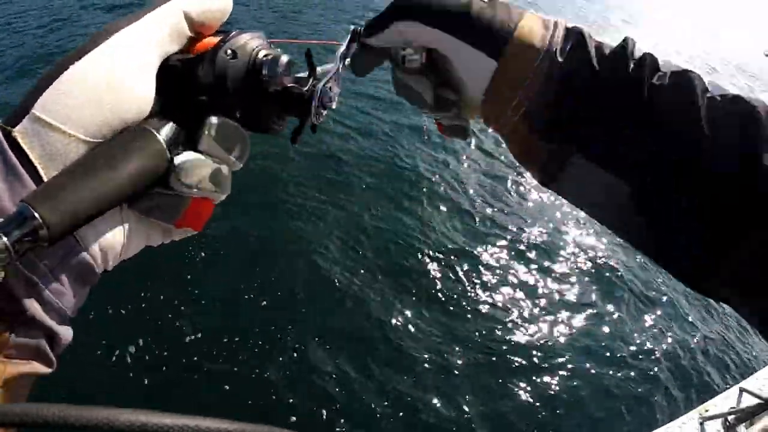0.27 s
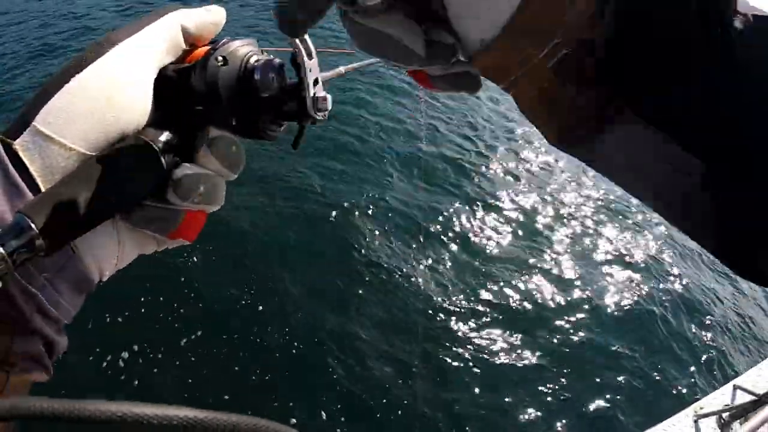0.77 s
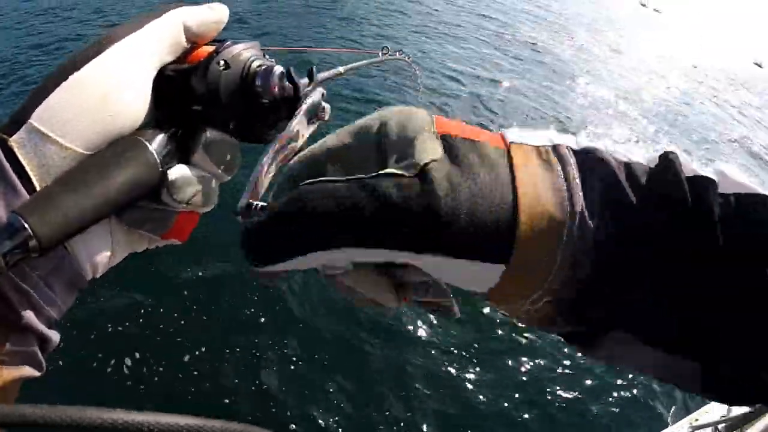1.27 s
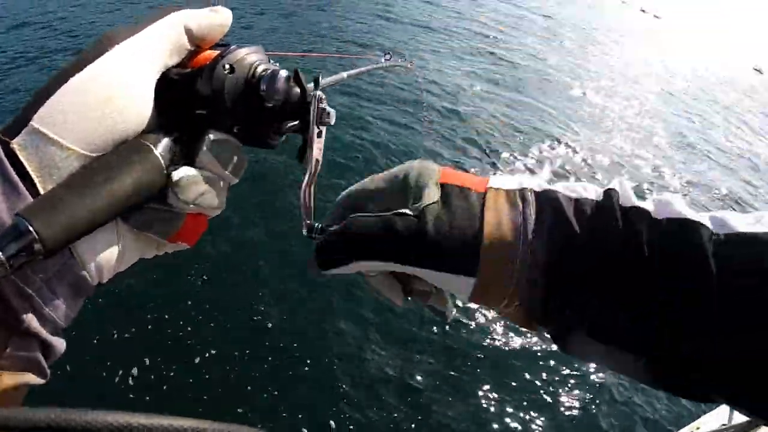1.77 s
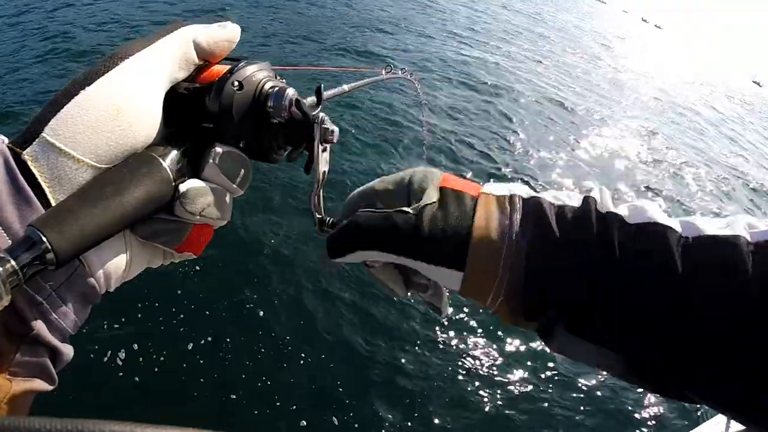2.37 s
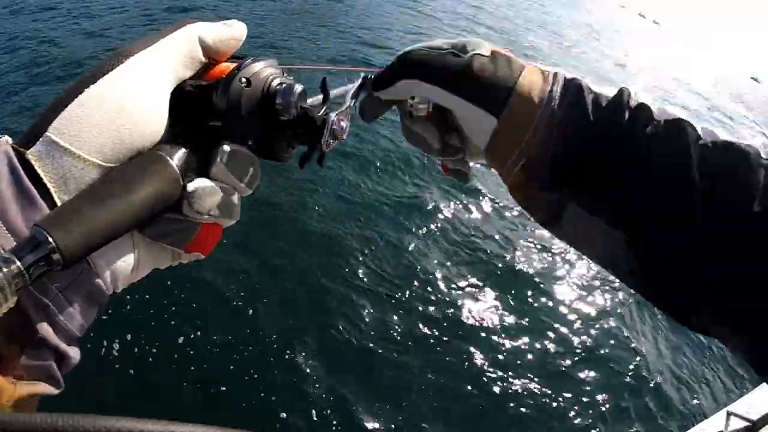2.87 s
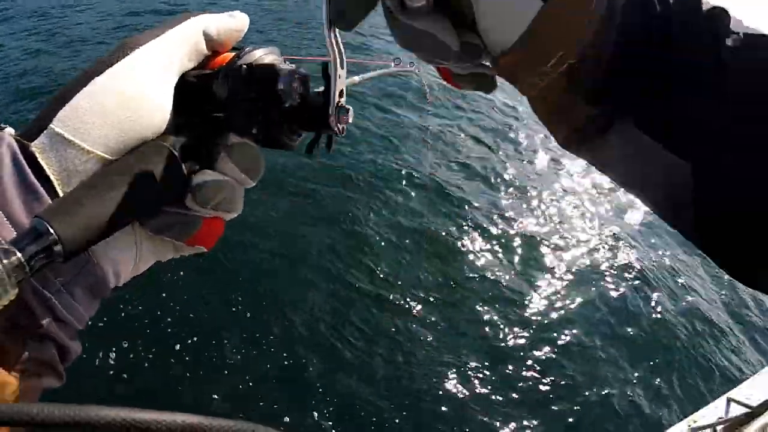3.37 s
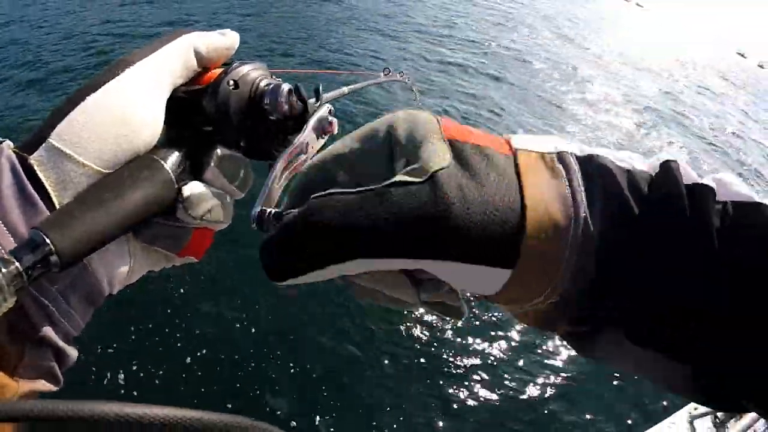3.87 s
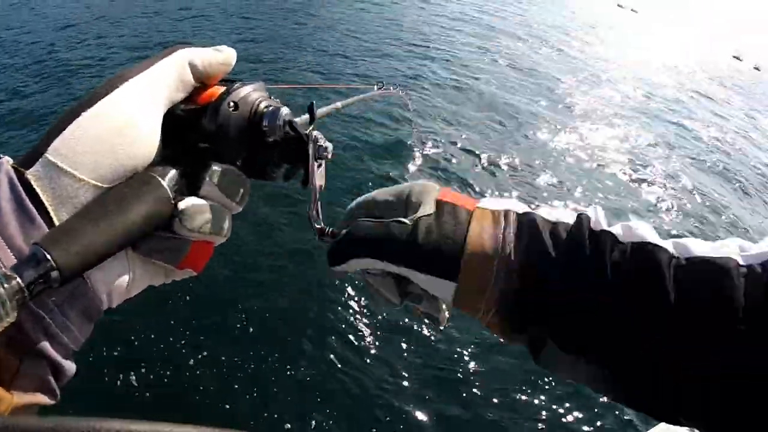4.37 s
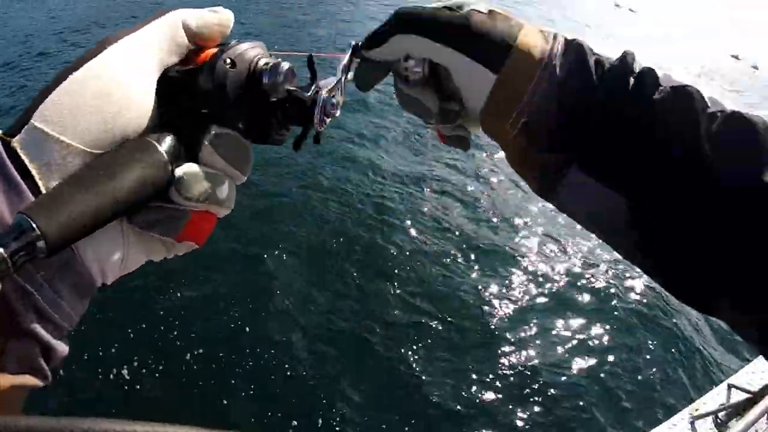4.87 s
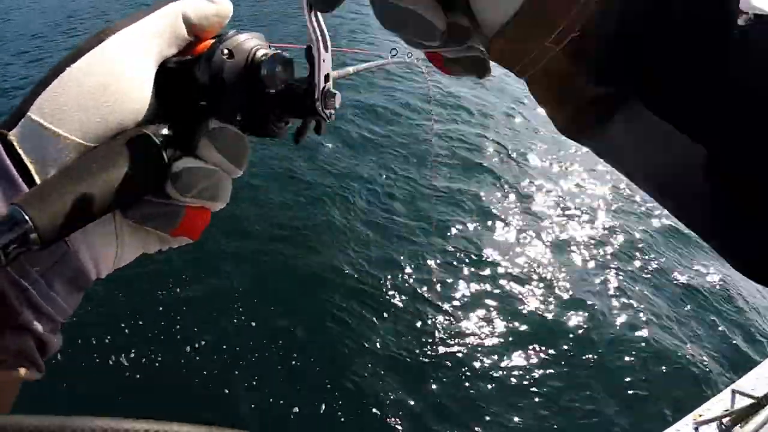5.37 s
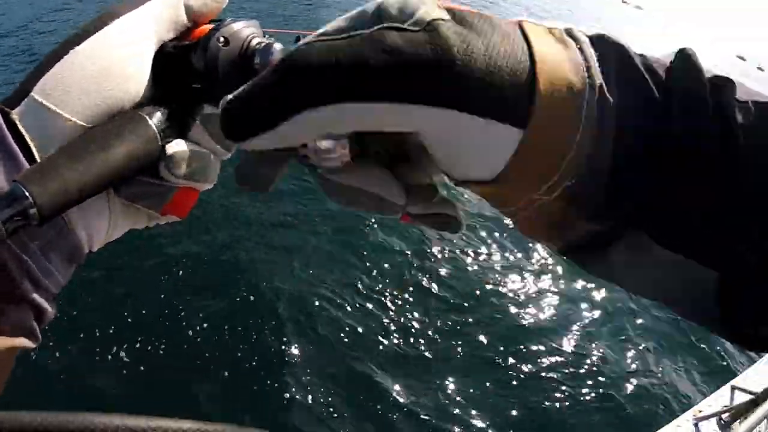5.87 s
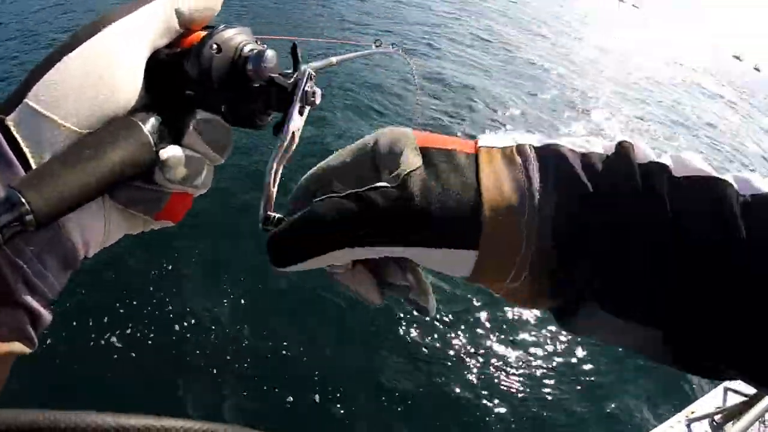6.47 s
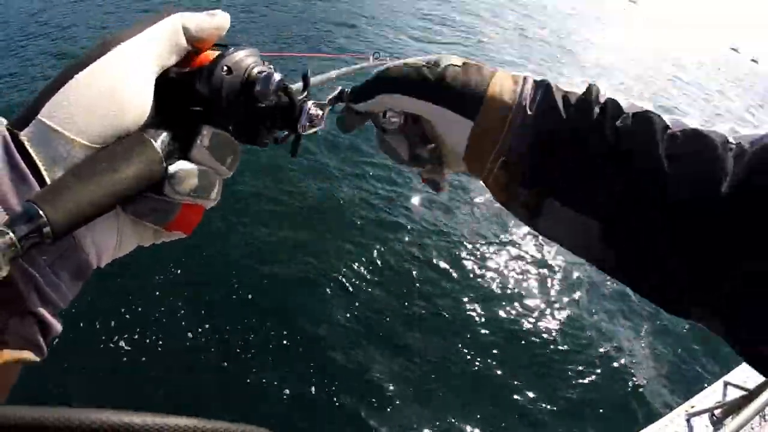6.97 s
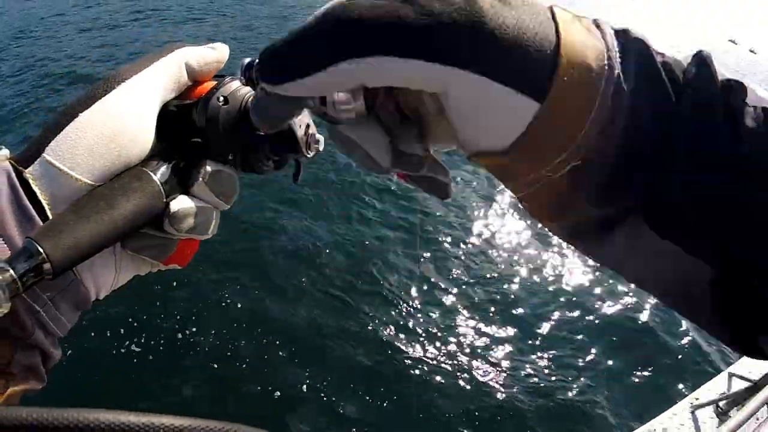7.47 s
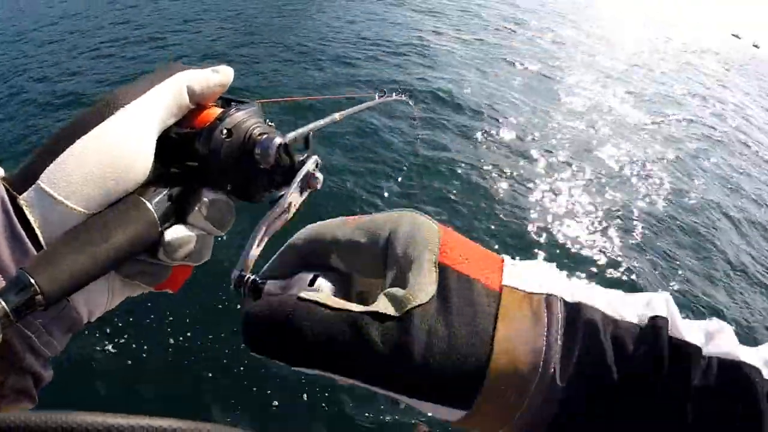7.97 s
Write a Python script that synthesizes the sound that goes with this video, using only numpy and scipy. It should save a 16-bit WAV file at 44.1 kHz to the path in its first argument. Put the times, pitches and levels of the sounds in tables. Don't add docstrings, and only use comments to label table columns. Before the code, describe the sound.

Wind thumps and buffets a housed microphone over low idling engines, while a fishing reel whirrs and ticks and water washes the hull.

```python
import sys
import numpy as np
from scipy import signal
from scipy.fft import rfft, irfft, next_fast_len
from scipy.io import wavfile
from scipy.ndimage import uniform_filter1d, minimum_filter1d

SR = 44100
rng = np.random.default_rng(int(sys.argv[2]) if len(sys.argv) > 2 else 0)


def attenuation_scalar(level_db):
    decades = np.asarray(level_db, float) / 20
    return 10 ** decades


def bounce(signal):
    frames = np.transpose(np.atleast_2d(signal))
    limited = np.clip(frames, -1, 1)
    pcm = np.round(limited * 32767).astype(np.int16)
    wavfile.write(sys.argv[1], SR, pcm)


N = 361971
T = np.arange(N) / SR


def rms_one(x):
    return x / np.sqrt(np.mean(x ** 2) + 1e-20)


def in_time(rows):
    s, level_db = np.transpose(rows)
    return np.interp(T, s, level_db)


def drift(rate):
    r = np.exp(-80 * np.pi * rate / SR)
    slow = signal.lfilter([1], [1, -2 * r, r * r], rng.standard_normal(N // 40 + 2002))[2000:]
    return np.interp(np.arange(N) / 40, np.arange(len(slow)), rms_one(slow))


def swells(times, peaks_db, half_s):
    coarse = T[::40, None]
    bells = attenuation_scalar(np.array(peaks_db)) * np.exp(-((coarse - np.array(times)) / half_s) ** 2)
    return np.interp(T, coarse[:, 0], bells.sum(axis=1))


def noise_bands(spectrum, edges_hz):
    size = next_fast_len(N)
    log_hz = np.log(np.maximum(np.arange(size // 2 + 1) * SR / size, 1))
    hz, db = np.transpose(spectrum)
    colour = attenuation_scalar(np.interp(log_hz, np.log(hz), db, -140, -140))
    whole = rfft(rng.standard_normal(size)) * colour
    bands = []
    for own in np.eye(len(edges_hz)):
        share = np.interp(log_hz, np.log(edges_hz), own)
        bands.append(irfft(whole * share, size)[:N])
    return np.array(bands) / np.std(sum(bands))


def resonance(x, hz, width_hz):
    r = np.exp(-np.pi * width_hz / SR)
    zeros = np.array([1, 0, -1]) * (1 - r * r) / 2
    return signal.lfilter(zeros, [1, -2 * r * np.cos(2 * np.pi * hz / SR), r * r], x + 1e-18)


def narrow_noise(hz, width_hz, steadiness):
    r = np.exp(-np.pi * width_hz / SR)
    slow = signal.lfilter([1], [1, -2 * r, r * r], rng.standard_normal((2, N)))
    wander = slow[0] + 1j * slow[1]
    wander = wander / (np.abs(wander) + 0.14 * np.std(wander)) ** np.clip(steadiness, 0, 1)
    band = np.real(wander * np.exp(2j * np.pi * np.cumsum(hz + 0 * T) / SR))
    return rms_one(resonance(band, np.mean(hz), 4 * width_hz))


def blows(events, length_s, width_hz, top_hz, order=4):
    size = 3000
    out, t = np.zeros(N + size), np.arange(size) / SR
    shut = signal.butter(order, top_hz, fs=SR, output="sos")
    fade = np.cos(np.pi / 2 * t / t[-1]) ** 2
    for (s, db, hz), rattle in zip(events, rng.standard_normal((len(events), size))):
        crack = (t == 0) + rattle * np.exp(-t / length_s) * .5 / np.sqrt(length_s * SR)
        burst = signal.sosfilt(shut, resonance(crack, hz, width_hz)) * fade
        start = int(s * SR)
        out[start:start + size] += attenuation_scalar(db + 3.0) * burst / np.abs(burst).max()
    return out[:N]


# (f/Hz, level/dB per Hz)
SELF_NOISE = [(3000, -6), (5900, -5.5), (6350, 0), (8000, -2), (10000, -6), (11400, -10), (12200, -8.5),
              (14000, -10.5), (14900, -13), (15500, -32)]


def preamp_hiss():
    return attenuation_scalar(-65) * noise_bands(SELF_NOISE, [1000])[0]


def hum(cycle_hz, orders, wobble):
    turn = 2 * np.pi * cycle_hz * T + wobble * drift(0.53)
    start = rng.random((len(orders), 1)) * 2 * np.pi
    return sum(np.sqrt(2) * attenuation_scalar(db) * np.sin(k * turn + p) for (k, db), p in zip(orders, start))


MAIN_CYCLE_HZ, AUX_CYCLE_HZ, GENERATOR_TURN_HZ = 6.019, 7.906, 12.13
# (multiple of its cycle, level/dB rms)
MAIN = [(5, -24.5), (6, -31), (13, -33.5), (14, -27.5), (24, -43.5), (27, -41), (42, -42), (56, -45.5),
        (58, -49.5), (71, -64), (75, -63)]
# (multiple of its cycle, level/dB rms)
AUX = [(6, -25), (14, -26.5), (18, -37.5), (26, -55), (28, -40.5), (32, -50.5), (34, -42), (46, -47),
       (56, -52.5)]
# (multiple of its turn, level/dB rms)
GENERATOR = [(5, -24.5), (10, -36), (17, -46.5), (25, -44.5), (30, -47.5), (34, -45.5)]


def engines():
    main = hum(MAIN_CYCLE_HZ, MAIN, 0.019)
    aux = hum(AUX_CYCLE_HZ, AUX, 0.021)
    return main + aux + hum(GENERATOR_TURN_HZ, GENERATOR, 0.015)


# (place in the cycle 0-1, level/dB)
KNOCKS = [
    (.02, -10.5),
    (0.199, -11),
    (0.359, 6),
    (0.488, 3.5),
    (.66, 1.5),
    (0.759, -0.5),
]


def block_knock(level_db, hz, width_hz):
    clicks = np.zeros(N)
    cycles = np.arange(int(N / SR * MAIN_CYCLE_HZ))
    for place, db in KNOCKS:
        at = ((cycles + place) / MAIN_CYCLE_HZ * SR).astype(int)
        clicks[at] = attenuation_scalar(db + 0.73 * rng.standard_normal(len(at)))
    ring = resonance(resonance(clicks, hz, width_hz), hz, 3 * width_hz)
    return attenuation_scalar(level_db) * rms_one(ring)


# (f/Hz, width/Hz, level/dB)
COVER = [(1432, 67, -0.5), (1599, 180, 4.5), (1760, 190, 0), (2923, 53, -6.5), (3390, 270, 1)]
# (t/s, level/dB)
CLATTER = [(0, -61), (.9, -55.5), (1.1, -53.5), (1.85, -56.5), (2.4, -56), (3.5, -54), (3.95, -53),
           (4.94, -55), (5.4, -57), (6.4, -53), (7.0, -56.5), (7.5, -66.5), (8.21, -52)]


def valve_clatter(sharpness, place, uneven_db):
    firing = 6 * AUX_CYCLE_HZ * T - place
    strengths = attenuation_scalar(uneven_db * rng.standard_normal(int(firing[-1]) + 3))
    strength = strengths[np.round(firing).astype(int)]
    pulse = np.exp(sharpness * (np.cos(2 * np.pi * firing) - 1))
    puffs = pulse * strength * rng.standard_normal(N)
    rings = sum(attenuation_scalar(db) * rms_one(resonance(resonance(puffs, hz, w), hz, 2 * w)) for hz, w, db in COVER)
    return attenuation_scalar(in_time(CLATTER) - 4.5) * rings


# (t/s, peak level/dB, f/Hz)
TAPS = [(0.643, -41.5, 3290), (0.6844, -46, 3310), (0.7483, -43, 3590), (0.772, -43.5, 3450),
        (0.7898, -45, 3510), (1.1256, -41, 3290), (1.4626, -42.5, 3170), (1.5485, -43.5, 3310),
        (1.5852, -41.5, 3390), (1.8025, -43.5, 3460), (2.0978, -39, 3370), (2.1818, -43, 3390),
        (2.4137, -40.5, 3520), (2.4545, -45, 3600), (2.9182, -38.5, 3390), (3.4253, -44, 3390),
        (3.4887, -40.5, 3410), (3.554, -35, 3210), (3.8064, -38, 3370), (3.846, -38, 3360),
        (3.8886, -41.5, 3350), (3.9518, -37.5, 3390), (4.0793, -42, 3150), (4.203, -40.5, 3250),
        (4.287, -43.5, 3440), (4.3113, -39, 3210), (4.3557, -39, 3200), (4.3731, -39, 3200),
        (4.4805, -41.5, 3440), (4.4983, -42, 3340), (4.634, -38, 3270), (4.7339, -41, 3230),
        (4.7546, -39, 3120), (4.8378, -37, 3350), (4.8569, -39.5, 3400), (4.9428, -41, 3390),
        (4.9645, -37, 3360), (5.0055, -41.5, 3600), (5.1106, -41.5, 3480), (5.8302, -44, 3240),
        (5.8488, -38.5, 3340), (5.8692, -40.5, 3450), (5.9354, -41, 3160), (5.954, -40, 3470),
        (6.207, -47.5, 3340), (6.2698, -46, 3190), (6.3965, -44.5, 3340), (6.437, -41.5, 3610),
        (6.4598, -39.5, 3410), (6.5033, -39.5, 3470), (6.7547, -42.5, 3360), (6.7767, -46, 3540),
        (7.0301, -37, 3210), (7.5773, -41.5, 3250), (8.041, -38, 3320), (8.0864, -41.5, 3280)]


def valve_taps():
    return attenuation_scalar(-0.5) * resonance(blows(TAPS, .004, 260, 5000), 3380, 600)


# (start t/s, length/s, first f/Hz, last f/Hz, level/dB)
MOANS = [
    (0.322, 0.12, 508, 423, -36),
    (1.067, 0.074, 515, 498, -33),
    (1.204, .07, 900, 910, -46),
    (3.647, 0.31, 494, 438.6, -34.5),
]


def moans():
    out = np.zeros(N)
    for s, length, first_hz, last_hz, db in MOANS:
        part = np.clip((T - s) / length, 0, 1)
        flutter = 3 * drift(24)
        shape = np.minimum(part * 12, 1) * (1 - part) ** 0.41 * attenuation_scalar(db - 1.5 + flutter)
        pitch_hz = first_hz + (last_hz - first_hz) * part + 12 * drift(30)
        out += np.sqrt(2) * shape * np.sin(2 * np.pi * np.cumsum(pitch_hz) / SR)
    return out


# (t/s, level/dB)
WASH = [(0, -61), (.03, -55), (.3, -51), (.71, -47.5), (1.03, -47), (1.23, -48.5), (1.45, -47.5),
        (2.4, -47.5), (2.95, -47.5), (4.46, -47.5), (5.1, -46), (5.25, -48), (6.44, -48.5), (6.95, -49.5),
        (7.2, -46), (7.6, -48.5), (7.8, -47), (8.05, -47.5)]
# (f/Hz, level/dB per Hz)
WASH_COLOUR = [(350, -36.5), (600, -2), (853, -20.5), (892, -6.5), (959, -16), (1070, -13.5), (1260, -12),
               (1430, -8.5), (1990, -8.5), (2160, -3.5), (2610, -10), (3040, -14), (3420, -11.5),
               (3770, -16.5), (5250, -19.5), (6500, -62), (11400, -120)]
# (t/s, peak level/dB)
SPLASHES = [
    (2.451, -58.5),
    (5.099, -67.5),
    (7.25, -62),
    (7.5, -45.5),
    (7.679, -55.5),
    (7.77, -53.5),
    (8.178, -50.5),
]
SPLASH_S, SPLASH_FROTH = 0.049, 0.68
FROTH_DB, SPRAY_DB, SPRAY_FLICKER_DB = -6, -10, 1.7


def wash(patchy_db):
    flow, splash = attenuation_scalar(in_time(WASH)), swells(*np.transpose(SPLASHES), SPLASH_S)
    shared = drift(9.9)
    bands = noise_bands(WASH_COLOUR, np.geomspace(800, 5000, 7))
    bands = [b * attenuation_scalar(patchy_db * (0.93 * shared + drift(4.6))) for b in bands]
    froth = attenuation_scalar(FROTH_DB + 2.5) * rms_one(bands[4] + bands[5])
    spray = attenuation_scalar(SPRAY_DB - 6.0 + SPRAY_FLICKER_DB * drift(27)) * rms_one(bands[6])
    upper = signal.sosfilt(signal.butter(8, 6560, fs=SR, output="sos"), froth + spray)
    body = attenuation_scalar(2.5) * rms_one(sum(bands[:4]))
    return (flow + splash) * body + (flow + SPLASH_FROTH * splash) * upper


def droplets(per_s, level_db, cycles):
    sizes = attenuation_scalar(2.7 * np.minimum(rng.exponential(1, N), 4)) * (rng.random(N) < per_s / SR)
    dealt = rng.integers(0, 14, N)
    rings = np.zeros(N)
    for k, hz in enumerate(np.geomspace(1300, 2900, 14)):
        width_hz = hz / cycles
        ring = resonance(resonance(sizes * (dealt == k), hz, width_hz), hz, 3 * width_hz)
        rings += ring * (1500 / hz) ** 0.72
    return attenuation_scalar(in_time(WASH) + level_db) * rms_one(rings)


# (t/s, peak level/dB, f/Hz)
SLAPS = [
    (0.239, -28, 466),
    (0.276, -36, 534),
    (1.739, -31.5, 538),
    (5.089, -32, 564),
    (6.873, -31, 482),
    (7.915, -30, 500),
    (7.969, -35, 493),
    (7.998, -29, 540),
]


def hull_slaps():
    return blows(SLAPS, 0.0024, 220, 860)


# (t/s, thin line hiss level/dB, sleeve
# rub level/dB)
LINE = [
    (1.01, -65, -60.5),
    (3.17, -70.5, -59.5),
    (5.05, -75, -61.5),
    (7.11, -69.5, -49.5),
]
LINE_S = 0.13


def line_rub():
    s, hiss_db, sleeve_db = np.transpose(LINE)
    hiss = swells(s, hiss_db, LINE_S) * narrow_noise(6750, 1000, .1)
    sleeve = swells(s, sleeve_db, LINE_S) * narrow_noise(2950, 450, .1)
    return attenuation_scalar(1.5 * drift(20)) * (hiss + sleeve)


# (t/s, centre f/Hz, peak level/dB, half-length/s)
GLOVE = [
    (5.063, 2378, -47, 0.059),
    (7.259, 1820, -46.5, 0.1),
    (7.478, 1800, -40.5, 0.046),
    (7.721, 1880, -41, 0.11),
    (7.941, 1960, -51, .02),
    (8.169, 2010, -43, 0.12),
]


def glove(width_hz):
    s, hz, db, half_s = np.transpose(GLOVE)
    return swells(s, db - 0.5, half_s) * narrow_noise(np.interp(T, s, hz), width_hz, .45)


# (t/s, level/dB)
REEL = [(0, -56), (.5, -42), (1.3, -76.5), (2.0, -40.5), (3.1, -46), (3.7, -57), (4.6, -48), (5.5, -32.5),
        (6.3, -48), (6.9, -53), (7.5, -50), (8.21, -55)]
# (start t/s, length/s, level/dB, f/Hz)
CATCHES = [(0.732, 0.055, -48, 2130), (1.004, 0.041, -44, 2200), (1.175, 0.064, -44, 2170),
           (1.346, 0.038, -42, 2160), (1.564, 0.058, -42, 2170), (1.656, 0.052, -44, 2150),
           (1.988, 0.025, -45, 2230), (2.117, 0.148, -43.5, 2160), (2.646, 0.036, -39, 2220),
           (2.76, 0.108, -43.5, 2180), (2.979, 0.046, -44, 2190), (3.958, 0.087, -44, 2160),
           (4.151, 0.038, -39.5, 2160), (4.253, 0.06, -53, 2170), (4.406, 0.042, -48, 2150),
           (4.633, 0.039, -46, 2180), (4.82, 0.064, -40, 2160), (4.907, 0.073, -45, 2120),
           (5.02, 0.062, -47, 2230), (5.094, 0.076, -51, 2190), (5.301, 0.064, -46, 2140),
           (5.518, 0.074, -44.5, 2130), (5.607, 0.048, -43, 2130), (5.671, 0.084, -41.5, 2150),
           (5.911, 0.033, -45, 2170), (5.974, 0.054, -38.5, 2120), (6.079, 0.038, -46, 2170),
           (6.451, 0.091, -42, 2120), (6.716, 0.052, -46, 2150), (7.247, 0.036, -52, 2120),
           (7.416, 0.066, -43, 2150), (7.711, 0.044, -48, 2160), (8.068, 0.028, -51, 2110),
           (8.123, 0.074, -39.5, 2120)]
CATCH_EDGE_S, CATCH_WIDTH_HZ = .012, 95


def reel(hz, width_hz, rough_db):
    s, length, db, catch_hz = np.transpose(CATCHES)
    coarse = T[::40, None]
    held = np.clip(np.minimum(coarse - s, s + length - coarse) / CATCH_EDGE_S + 1, 0, 1) ** 2
    catch_gain = np.interp(T, coarse[:, 0], (held * attenuation_scalar(db - 5.5)).sum(axis=1))
    note_hz = np.interp(T, s + length / 2, catch_hz) + 45 * drift(9)
    notes = catch_gain * narrow_noise(note_hz, CATCH_WIDTH_HZ, 0.39)
    pull = attenuation_scalar(in_time(REEL) - 19.5 + rough_db * drift(25))
    return pull * narrow_noise(hz + 45 * drift(6.7), width_hz, .6) + notes


# (t/s, peak level/dB of the body, bright edge level/dB above it, body ring f/Hz)
TICKS = [(0.024, -38, -19, 2400), (0.044, -32, -16, 2480), (0.0552, -31, -14, 2460),
         (1.2168, -35, -29, 4070), (1.4631, -44, -24, 3850), (2.039, -42.5, -27, 4250),
         (2.1590, -42, -10, 4440), (2.7100, -45.5, -4, 4240), (2.896, -39.5, -16.5, 3850),
         (3.2830, -42, -15.5, 4210), (3.958, -26.5, -11.5, 3470), (4.004, -34, -10, 4240),
         (4.0690, -46.5, -21, 4570), (4.51, -43, -22, 5070), (4.6350, -24.5, -19, 2600),
         (4.6380, -41.5, -31.5, 4200), (4.752, -40, -24, 4600), (5.295, -34.5, -9.5, 4660),
         (5.8316, -41, -31.5, 3610), (6.0000, -38, -17, 4400), (6.0824, -31, -14, 3930),
         (6.137, -38, -27, 3950), (6.879, -44, -15, 4070), (7.127, -35, -12, 2980),
         (7.489, -41, -11.5, 4500), (8.171, -22, -10, 2920), (3.9530, -37.5, -29, 3510),
         (5.9542, -39, -24, 2890), (8.105, -39, -26.5, 3710), (8.1460, -38, -13, 3400)]


def ticks(edge_hz):
    bodies = [(s, db - 2.0, hz) for s, db, edge_db, hz in TICKS]
    edges = [(s, db + edge_db - 0.5, edge_hz) for s, db, edge_db, hz in TICKS]
    return blows(bodies, .002, 800, 4900, order=8) + blows(edges, .0012, 1500, 7000, order=12)


# (t/s, peak level/dB, f/Hz)
BUMPS = [(0.2, -15, 130.5), (1.751, -17, 134), (2.154, -21.5, 206), (3.03, -12.5, 143), (3.656, -17.5, 125),
         (4.163, -15, 161.4), (4.927, -14.5, 154), (6.49, -12, 160), (6.875, -7, 241), (7.119, -17, 132),
         (7.631, -6.5, 130), (8.128, -14, 170), (.041, -18, 120), (.569, -19, 160), (2.127, -29.5, 128),
         (2.299, -18.5, 170), (2.619, -13, 134), (2.853, -18.5, 209.5), (4.326, -19, 120),
         (5.732, -16, 167), (6.368, -28.5, 148), (6.76, -25, 116), (6.873, -9.5, 106), (7.03, -24, 125),
         (7.105, -17.5, 260), (7.23, -23, 119)]


def hand_bumps():
    return blows(BUMPS, 0.025, 57, 410, order=6)


# (t/s, peak level/dB, f/Hz)
PUFFS = [(0.098, -24, 248), (0.196, -20, 221), (0.324, -14, 320), (0.566, -27, 229), (0.662, -18, 250),
         (1.29, -16, 260), (1.523, -35, 266), (1.744, -17, 221), (1.851, -18, 221), (2.129, -11.5, 285),
         (2.404, -22, 221), (2.749, -31, 229), (2.944, -19.5, 261), (3.007, -11.5, 248), (3.19, -17, 261),
         (3.318, -19, 228), (3.568, -21.5, 253), (3.658, -17, 240), (3.777, -19, 237), (4.053, -20, 234),
         (4.163, -13, 231), (4.298, -14, 240), (4.497, -23, 326), (4.568, -27, 277), (5.21, -20, 221),
         (5.373, -31, 272), (5.55, -18.5, 290), (6.109, -14.5, 266), (6.328, -26, 237), (6.396, -24, 242),
         (6.49, -15, 254), (6.588, -28, 221), (6.768, -14.5, 229), (6.873, -15.5, 226), (6.961, -26, 288),
         (7.035, -30, 323), (7.176, -22, 256), (7.377, -19, 261), (7.47, -17.5, 253), (7.525, -21, 280),
         (7.608, -19, 235), (7.747, -22, 266), (7.828, -17, 307), (7.915, -28, 334), (8.093, -28, 221)]
# (t/s, peak level/dB, f/Hz)
SURGES = [(0.312, -4.5, 73.5), (0.827, -7.5, 80.3), (1.166, -5, 80.4), (1.297, -14.5, 55.7),
          (1.63, -10.5, 68), (2.008, -14.5, 67), (2.131, 0, 68.8), (2.305, -9, 87), (2.952, -5, 88.5),
          (3.116, -11, 61.5), (3.261, -6, 67.3), (3.611, -9.5, 50.4), (3.787, -7, 86.1),
          (4.253, -9.5, 61.9), (4.406, -8, 107.6), (4.622, -14, 83), (4.947, -13.5, 62),
          (5.061, -5.5, 73.3), (5.298, -17.5, 51), (5.526, -8.5, 50.9), (5.949, -17.5, 50.5),
          (6.129, -5.5, 94), (6.338, -11, 64.2), (6.623, -17.5, 86.5), (6.755, -12, 73),
          (6.867, -10.5, 91.5), (6.976, -24.5, 78.1), (7.265, -7, 89.7), (7.44, -7.5, 113.3),
          (7.615, -7.5, 61.8), (7.783, -10, 60.8), (7.96, -6.5, 92)]


def puffs_and_surges():
    return attenuation_scalar(-4.5) * (blows(PUFFS, 0.0071, 69, 570) + blows(SURGES, 0.028, 24, 140))


# (t/s, level/dB)
WIND = [(0, -18.5), (1.1, -17), (1.5, -18), (2.2, -19), (2.7, -23), (3.3, -21), (4.1, -19), (4.6, -17),
        (5.3, -21.5), (5.8, -19), (6.4, -17.5), (7.3, -18), (7.7, -17), (8.0, -21), (8.21, -9.5)]
# (f/Hz, level/dB per Hz)
BUFFET = [(4.7, -33.5), (8.0, -7), (38, -2), (99, -7.5), (119, -7.5), (191, -13), (265, -17), (307, -21),
          (409, -24.5), (569, -38.5), (775, -44.5), (895, -45.5), (972, -51.5), (1100, -53), (1430, -68.5),
          (2420, -120)]
# (t/s, peak level/dB)
HEAVES = [(.13, -15.5), (.2, -13), (.59, -14.5), (1.03, -12), (1.17, -13), (1.48, -38), (1.94, -27),
          (2.08, -33), (2.26, -27), (2.36, -31), (2.51, -12), (2.831, -9.5), (3.04, -7), (3.17, -14),
          (3.31, -14.5), (3.45, -17), (3.61, -20), (3.91, -14), (4.18, -22), (4.5, -17), (4.64, -20.5),
          (4.75, -13), (4.85, -24), (4.96, -14), (5.67, -13.5), (6.1, -31), (6.42, -20.5), (6.81, -9.5),
          (6.9, -16.5), (7.06, -27), (7.149, -13), (7.82, -15.5)]
# (t/s, flapping level/dB, sharp eddies level/dB)
GUSTS = [(.07, -19.5, -24), (.19, -39, -37), (.59, -21.5, -58), (1.17, -23, -27), (1.39, -38, -35),
         (1.87, -16, -38), (2.17, -19, -21.5), (2.45, -19.5, -35), (3.039, -11, -28), (3.11, -21, -44),
         (3.31, -18, -46), (3.4, -12.5, -46), (3.662, -10, -25), (3.75, -34, -30), (3.91, -24, -34),
         (4.16, -14, -33), (4.5, -12, -55), (4.849, -11, -37), (4.96, -20, -52), (5.12, -9, -49),
         (5.3, -19.5, -37), (5.8, -45, -37), (6.2, -30, -33), (6.3, -25, -51), (6.41, -11.5, -27),
         (6.54, -10.5, -46), (6.84, -33, -28), (7.11, -27, -25.5), (7.25, -17, -48), (7.31, -37, -26),
         (7.82, -17.5, -41), (7.92, -24, -48), (8.158, -8, -34), (8.21, -23, -46)]
HEAVE_S, GUST_S = 0.031, 0.044
FLAP_DB, EDDY_DB = -1, -6


def wind(lump_db, lump_rate):
    breeze = attenuation_scalar(in_time(WIND))
    s, flap_db, eddy_db = np.transpose(GUSTS)
    low, flap, mid, upper, top = noise_bands(BUFFET, [45, 100, 200, 340, 600])
    bursts = drift(lump_rate)
    eddies = mid * attenuation_scalar(lump_db * bursts) + upper * attenuation_scalar(lump_db * (0.46 * bursts + 0.39 * drift(23)))
    heave_gain = breeze * attenuation_scalar(2.0 * bursts + 0.96 * drift(3.1) - 1.0) + swells(*np.transpose(HEAVES), HEAVE_S)
    flap_gain = attenuation_scalar(-6.0) * (breeze * attenuation_scalar(FLAP_DB) + swells(s, flap_db, GUST_S))
    eddy_gain = attenuation_scalar(-5.5) * (breeze * attenuation_scalar(EDDY_DB) + swells(s, eddy_db, GUST_S))
    buffeting = heave_gain * rms_one(low) + flap_gain * rms_one(flap) + eddy_gain * rms_one(eddies)
    return buffeting + attenuation_scalar(-12.0 + 0.85 * bursts) * top


def wind_guard(x):
    top, size = 0.6, int(0.01 * SR)
    gain = 1 / (1 + np.abs(x / top) ** 7.2) ** (1 / 8.3)
    return x * uniform_filter1d(minimum_filter1d(gain, size), size)


def scene():
    rattle = block_knock(-56.5, 897.6, 34) + valve_clatter(2.8, 0.54, 2.0) + valve_taps()
    water = wash(1.3) + droplets(130, -8.0, 34) + hull_slaps() + moans()
    near = reel(2160, 210, 1.2) + glove(150) + line_rub() + ticks(5600)
    lumps = hand_bumps() + puffs_and_surges()
    low = wind_guard(attenuation_scalar(-1.0) * wind(1.77, 15.0) + engines() + lumps)
    return (low + rattle + water + near)[None]


def low_pass(x):
    return signal.sosfilt(signal.butter(12, 15480, fs=SR, output="sos"), x)


def record(dry):
    mix = dry + preamp_hiss()
    return low_pass(mix)


dry = scene()
out = record(dry)
bounce(out)
```